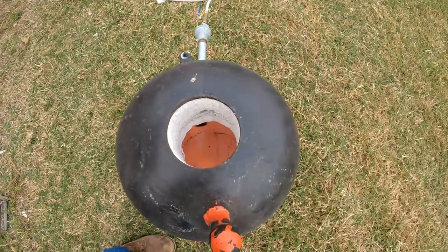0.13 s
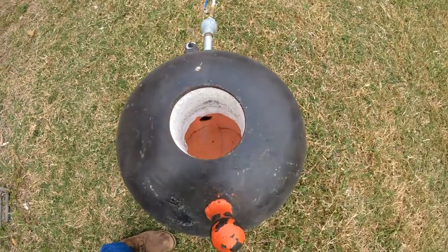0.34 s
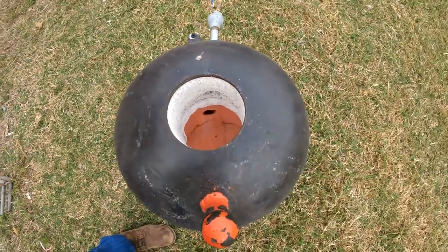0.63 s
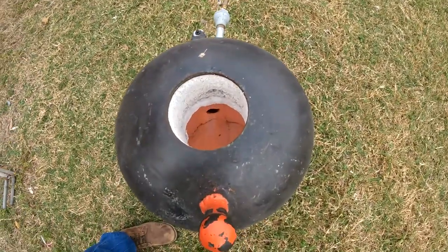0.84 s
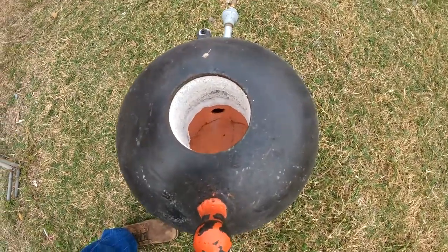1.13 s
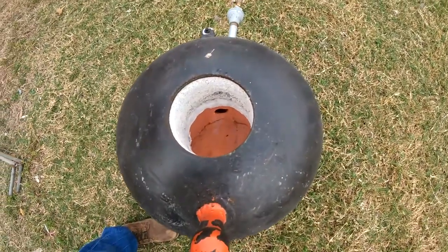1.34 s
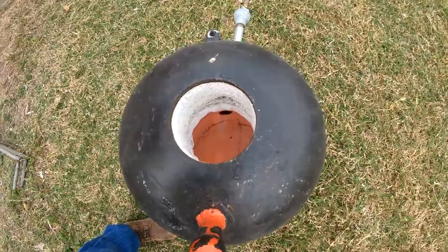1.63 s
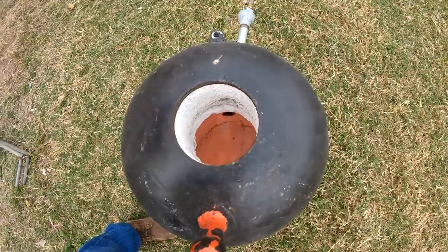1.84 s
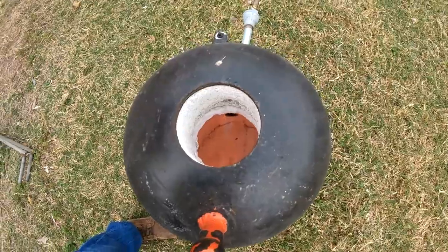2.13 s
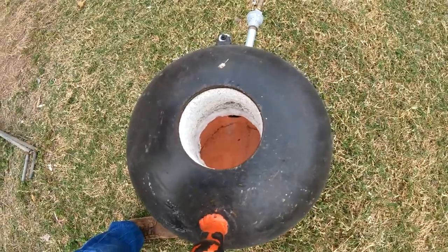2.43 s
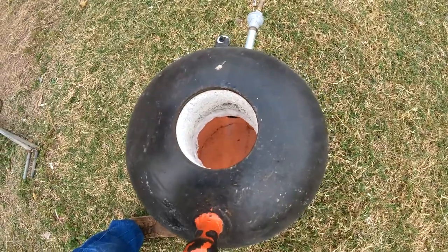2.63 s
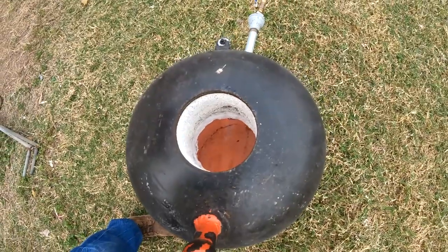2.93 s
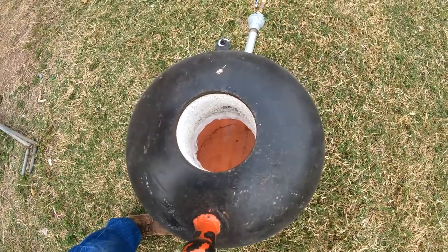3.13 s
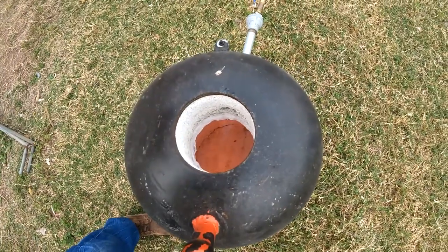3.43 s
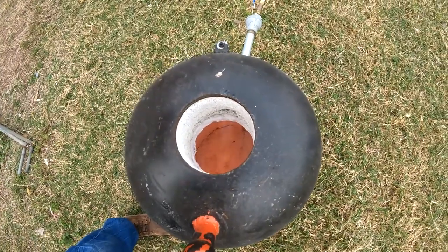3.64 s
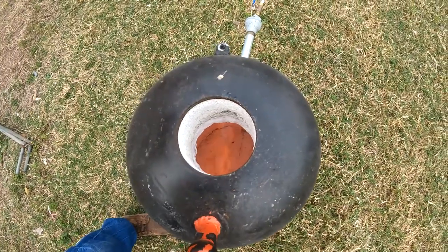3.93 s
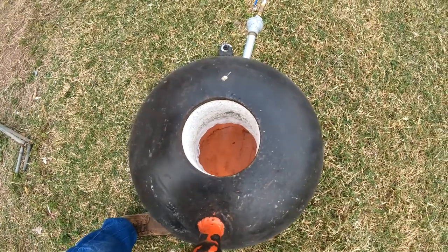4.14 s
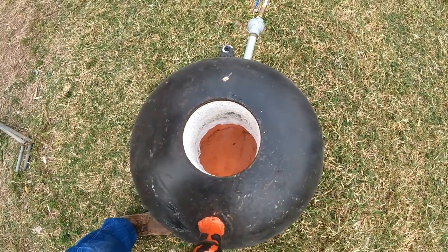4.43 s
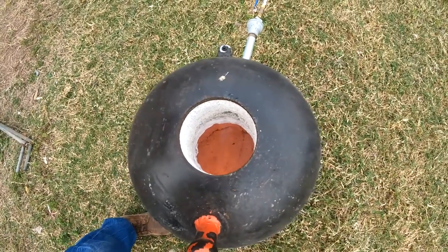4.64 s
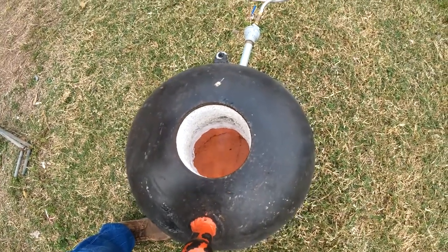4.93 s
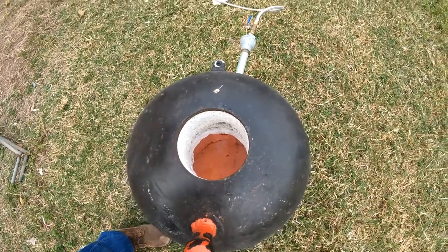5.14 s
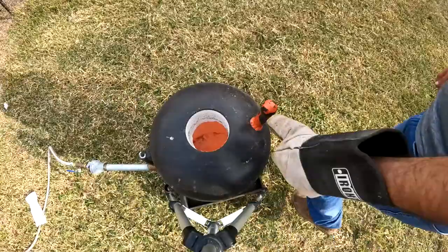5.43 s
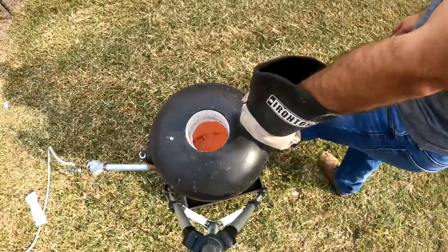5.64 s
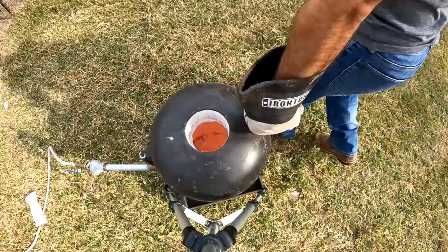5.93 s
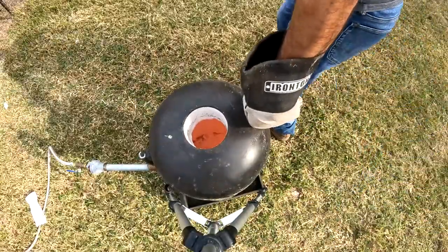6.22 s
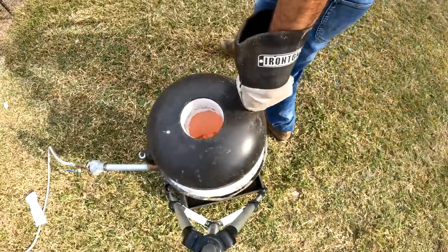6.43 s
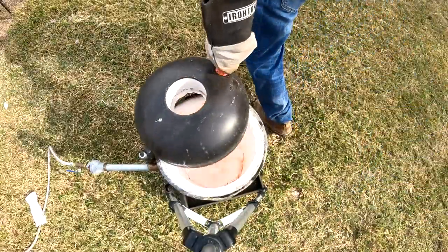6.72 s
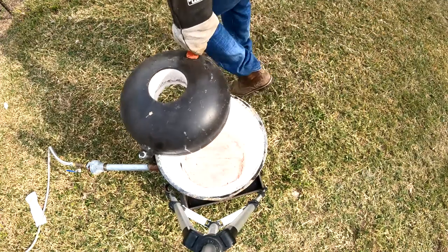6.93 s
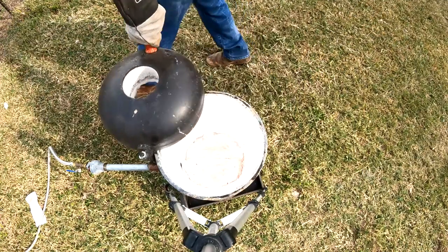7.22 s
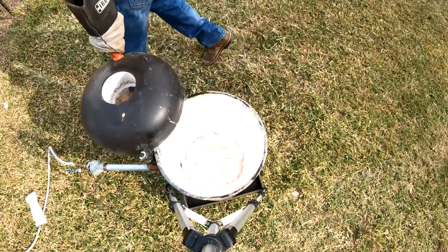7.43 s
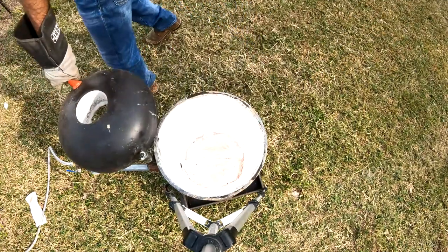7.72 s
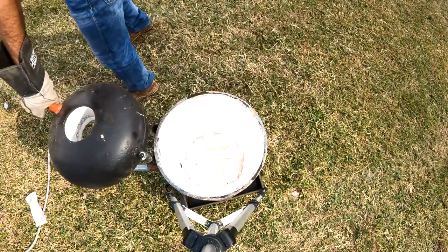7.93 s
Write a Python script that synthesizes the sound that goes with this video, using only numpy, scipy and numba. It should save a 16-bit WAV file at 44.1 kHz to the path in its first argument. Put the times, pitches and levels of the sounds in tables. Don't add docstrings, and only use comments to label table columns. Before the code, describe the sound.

From 0 to 5.2 seconds a gas burner roars inside a lidded furnace on a lawn, heard close from above with a handheld microphone. A deep, narrow boom around 155 to 165 Hz dominates, fluttering with quick gulps, over soft flame turbulence. Very quiet gas and grass hiss comes in small gusts, with faint insects trilling near 10 kHz and light low wind buffets. At about 5.26 seconds a tiny tick marks an abrupt move to a stand; the boom continues, narrower in stereo, and the flame briefly sinks around 5.5. From about 6.2 the lid swings off, and the hollow note jumps past 200 Hz, wavering upward to about 260 by the end. At 6.97 a dull lid-on-pivot knock leaves a thin steel ring. Until 8.1 the open roar is brighter, with an uneven narrow jet rush, clearer hiss and stronger wind buffets near the end.

```python
import sys
import numpy as np
from scipy import signal
from scipy.fft import rfft, irfft
from scipy.io import wavfile
from scipy.ndimage import uniform_filter1d
from numba import njit

SR = 44100
rng = np.random.default_rng(int(sys.argv[2]) if len(sys.argv) > 2 else 0)


def master_out(mix):
    frames = np.transpose(np.atleast_2d(mix))
    ceiling = np.clip(frames, -1, 1)
    pcm = np.round(ceiling * 32767).astype(np.int16)
    wavfile.write(sys.argv[1], SR, pcm)


def gain_from_decibels(decibels):
    exponent = np.asarray(decibels, float) / 20
    return 10 ** exponent


N = 356548
T = np.arange(N) / SR

CHANGE_S = 5.2605
AT_HAND = T < CHANGE_S
# time in seconds, share open 0-1
LID_OPEN = [
    (0, 0.05),
    (6.3, 0.02),
    (6.6, 0.8),
    (6.9, 0.92),
    (7.3, 0.83),
    (8.08, 1),
]
# time in seconds, share 0-1
MOUTH_BARED = [(0, 0.24), (6.5, 0), (6.7, 0.45), (6.85, .6), (7.0, 0.71), (7.5, 1), (8.08, 0.94)]

# time in seconds, pitch in Hz
HOLLOW_NOTE = [(0, 155), (1.3, 164.7), (3, 155), (5.2, 160.6), (5.8, 161.5), (6.15, 165.3), (6.27, 208.4),
               (6.39, 230.7), (6.5, 210.5), (6.68, 224), (6.8, 241.8), (7.1, 238.7), (8.08, 262.7)]
BOOM_DB, RUMBLE_DB, FLAME_DB = (-16.5, -17, -15), (-28.5, -33, -30), (-40, -40, -30.5)
# centre in seconds, half length in seconds, change in dB
FALTERS = [
    (.1, 0.22, 1),
    (1.25, .15, 0.5),
    (2.05, 0.11, 0.5),
    (4.2, 0.34, 0.5),
    (5.17, 0.075, 1.5),
    (5.5, 0.18, -4),
    (6.66, 0.072, 1),
    (6.87, 0.04, -4),
    (7.17, 0.11, 1),
    (7.45, 0.13, -1.5),
]
# centre in seconds, half length in seconds, change in dB
THROBS = [(.4, 0.018, -6), (1.32, 0.017, 2.5), (1.39, 0.014, -5), (1.75, 0.014, -5), (2.54, .015, -1),
          (3.18, .02, -4), (3.74, 0.01, -8), (4.29, 0.017, 3), (4.32, .02, -4), (4.645, 0.015, -9.5),
          (4.79, .012, -4.5), (5.13, 0.027, 2.5), (5.7, 0.014, -6), (6.12, 0.025, -4), (6.65, .015, 3.5),
          (6.78, 0.012, 7), (6.99, 0.015, -3), (7.05, 0.022, 0.5), (7.13, 0.011, 4.5), (7.155, .01, -9),
          (7.22, 0.036, 2), (7.29, 0.019, -6.5)]
# pitch in Hz, density in dB per Hz
RUMBLE_SHUT = [(8, -43), (18, -24.5), (30, -17), (60, 8), (100, 12.5), (140, 9.5), (200, -18.5),
               (300, -58.5), (600, -140)]
# pitch in Hz, density in dB per Hz
RUMBLE_OPEN = [(8, -46), (18, -12.5), (30, -6), (60, 2), (100, 1.5), (150, 7), (170, 5), (200, -3),
               (300, -53.5), (600, -140)]
# centre in seconds, half length in seconds, change in dB
RUMBLE_LULLS = [
    (2.45, 0.091, 5.5),
    (3.7, 0.18, 0),
    (6.1, 0.13, -13.5),
    (6.8, .2, -1.5),
    (7.9, 0.37, 2.5),
]
# pitch in Hz, density in dB per Hz
FLAME_SHUT = [
    [(200, -31), (340, -5), (354, -3), (426, 1.5), (698, -6.5), (848, -6.5), (939, -5), (1160, -7),
     (1430, -18.5), (1710, -21), (1870, -28.5), (2200, -33.5), (2860, -59), (4840, -120)],
    [(200, -33), (340, -3), (491, -4), (583, -10.5), (611, -14), (661, -13), (778, -14), (1130, -10.5),
     (1390, -26), (1880, -27.5), (2200, -36), (2860, -54.5), (4840, -120)],
]
# pitch in Hz, density in dB per Hz
FLAME_OPEN = [(200, -25), (340, -3), (377, -11), (424, -2), (520, -2.5), (644, -7), (750, -9), (803, -12),
              (1250, -15), (1800, -30.5), (2600, -35.5), (3380, -65.5), (5720, -120)]
# centre in seconds, half length in seconds, change in dB
LICKS = [
    (.52, .06, 4),
    (1.2, 0.11, 0.5),
    (3.4, 0.14, 0),
    (4.5, .1, -6.5),
    (4.73, 0.046, 0.5),
    (5.45, .1, 0),
    (6.3, 0.14, -3.5),
    (6.7, 0.049, 0),
    (7.5, 0.11, 1.5),
    (7.83, 0.09, 5),
]
# centre in seconds, half length in seconds, change in dB
FLARES = [(.5, .1, -0.5), (2, 0.096, -0.5), (3.4, .15, 1), (4.3, .1, 0.5), (4.9, 0.11, 1.5), (5.45, .1, -2),
          (6, .08, -2.5), (6.3, 0.11, -1), (6.72, .08, 1.5), (7.1, .1, 0.5), (7.3, 0.075, 1), (7.6, .1, 1)]
# pitch in Hz, width in Hz, level in dB
SHELL_HUMS = [(1975, 90, -73.5), (2406, 70, -76.5)]

HISS_DB, HISS_TOP_DB, AIR_DB = (-59.5, -60.5, -49.5), (-9, -6.5, -12), (-91, -88, -83)
# pitch in Hz, density in dB per Hz
HISS_SHUT = [
    [(1240, -29), (2100, -0.5), (3060, -3), (3270, -1.5), (4370, -1), (4940, -5), (5460, -5), (6200, -15),
     (8060, -39), (13600, -120)],
    [(1240, -31), (2100, -0.5), (2200, -7.5), (2380, 1.5), (2900, -4.5), (3410, -1), (3870, -4.5),
     (4540, -2), (6200, -15.5), (8060, -46.5), (13600, -120)],
]
# pitch in Hz, density in dB per Hz
HISS_OPEN = [(1240, -32), (2100, -8.5), (2440, -6), (2920, 1), (3390, 0), (5220, -7), (6200, -19.5),
             (8060, -46.5), (13600, -120)]
# pitch in Hz, density in dB per Hz
HISS_TOP = [(3500, -70.5), (4500, -25.5), (5500, -7), (6400, -8), (7400, -9.5), (8300, -12.5),
            (9300, -13.5), (10300, -13.5), (10700, -41.5), (11500, -95)]
# centre in seconds, half length in seconds, change in dB
BREEZE = [(.52, 0.033, 1.5), (1.3, 0.043, 1.5), (1.58, .03, 3), (1.8, .05, 1.5), (1.98, 0.038, -1),
          (2.32, 0.034, -1.5), (2.7, .05, 0), (2.84, 0.09, 3), (3.01, 0.02, 2), (3.17, 0.06, 3),
          (3.32, 0.032, 1.5), (3.44, 0.056, -3.5), (3.53, .05, -5.5), (3.632, 0.023, 3),
          (3.74, 0.052, -2.5), (3.92, 0.12, -3.5), (4.1, 0.049, 2.5), (4.27, .02, 1.5), (4.36, .04, 0),
          (4.5, 0.19, -7), (4.74, 0.05, 1.5), (4.86, .05, -2.5), (4.93, .03, -2.5), (5.02, 0.045, -6),
          (5.12, 0.03, 1), (5.2, 0.045, -4.5), (5.35, .12, -2), (5.6, .03, -2.5), (5.76, .04, 2.5),
          (6.08, 0.03, 0.5), (6.25, .1, 0), (6.68, 0.037, -1), (6.835, .012, 2), (6.87, .025, -0.5),
          (6.91, .015, -2.5), (6.95, 0.018, -3), (7.03, .03, 2.5), (7.14, 0.06, -2), (7.22, .025, 0.5),
          (7.28, 0.026, -2), (7.38, .05, 1.5), (7.51, 0.052, 1), (7.57, .02, -1.5), (7.63, .03, 1),
          (7.7, 0.04, -2), (7.81, .05, 4), (7.92, .04, 1.5)]
# pitch in Hz, gain in dB
GROUND_NOTCH = [(2700, -0.5), (2860, 1.5), (2990, -7.5), (3120, -0.5)]
# lower edge in Hz, upper edge in Hz, level in dB, share of patchiness
AIR_BANDS = [(10600, 11200, -9, 1), (11200, 11700, -6, 1), (11700, 12200, -4, .8), (12200, 12700, -4, .8),
             (12700, 13100, -6, 1), (13100, 13500, -7, 1), (13500, 13950, -6, .25), (13950, 14250, -10, .6),
             (14250, 14800, -18, 1.3)]

TRILL_RATE_HZ = [61.6, 63.4]
# centre in seconds, half length in seconds, change in dB
TRILL_BREAKS = [(.1, .12, 1), (.55, .15, -3), (1.2, .15, 3.5), (1.45, .05, -5), (1.99, .03, -10),
                (2.11, .03, 1), (2.69, .03, -13), (3.0, .04, -8), (4.2, 0.024, -8), (4.4, .06, 4),
                (4.54, 0.085, -8), (4.65, .03, -4), (4.78, .03, -7), (6.72, .1, -2), (7.5, 0.3, -7),
                (8.06, .15, 3)]
# band edges in Hz, levels before and after it presses in dB, time it presses in seconds
HIGH_SINGER = [(13550, 13900), (-103, -95), 1.8]
FAR_STOPS_S = 6.55

CALM_DB = -55
# centre in seconds, half length in seconds, dB over the calm
BUFFETS = [(.2, 0.076, 1), (.62, .15, 11), (1.0, .08, 5.5), (1.3, .13, 13), (1.55, .1, 7.5),
           (1.85, 0.073, 13), (2.1, 0.17, 12), (2.35, 0.19, 10.5), (3.38, 0.12, 12.5), (3.93, .08, 10),
           (4.47, 0.069, 17), (4.68, 0.04, 9.5), (6.32, .1, 27.5), (6.97, .08, 8.5), (7.25, .2, 7),
           (7.8, 0.14, 18.5), (8.05, .12, 23)]

# centre in seconds, half length in seconds, change in dB
JET_SURGES = [(5.7, 0.079, 5), (6.1, 0.093, 1), (6.6, .05, -9), (6.69, .05, 5), (6.87, 0.045, 8),
              (6.9, .015, 3), (6.94, .025, -5), (7.01, .02, 4), (7.05, 0.059, 1), (7.13, 0.03, 3),
              (7.23, .04, 4), (7.4, .05, 1.5), (7.51, 0.033, 2.5), (7.7, .04, -8), (7.84, 0.063, 4.5),
              (8.0, .06, 3.5)]
# time in seconds, level in dB
KNOCKS = [
    (6.9657, -16.5),
]
# pitch in Hz, level in dB, 60 dB decay in seconds
LID_MODES = [(680, -2, .025), (820, 0, .035), (1450, -3, .022), (1800, -10, .012), (2043, -20.5, .34),
             (2071, -25, .2), (2018, -31, .15), (2600, -25, .008), (2934, -32, .3)]

# time in seconds, dB over the usual width
WIDTH = [(0, -12), (1.2, -2), (3, 0.5), (5.25, 1.5), (5.27, -24.5), (6.9, -23), (7.1, -17), (7.6, -9.5),
         (8.08, -3.5)]
# pitch in Hz, side minus mid in dB
PORTS_HAND = [(50, -50), (110, -42), (165, -34), (220, -38.5), (290, -45.5), (400, -24), (600, -19.5),
              (800, -29.5), (900, -20.5), (1250, -17), (2300, -9.5), (7500, -8.5), (10000, -12),
              (12500, -1)]
# pitch in Hz, side minus mid in dB
PORTS_STAND = [(30, -60), (110, -32), (180, -30.5), (260, -33), (340, -46), (600, -44.5), (900, -26.5),
               (1250, -17), (2300, -9), (4500, -8.5), (8000, -1), (10000, -11.5), (12500, -13)]
# pitch in Hz, share in dB
LEAN_RIGHT = [(30, -57.5), (100, -52.5), (500, -38), (1000, -27), (1600, -50), (2400, -61)]
# pitch in Hz, share in dB
LEAN_LEFT = [(1600, -58.5), (4000, -27), (7500, -22), (9200, -28.5), (12000, -61.5)]
# start in seconds, end in seconds
ALIKE_BASS = [(0, .31), (.35, .47), (.77, .82), (1.08, 1.12), (1.2, 1.23), (5.27, 7.04), (7.44, 7.5),
              (7.53, 7.58)]


def read(table):
    s, *columns = np.transpose(table)
    return [np.interp(T, s, c) for c in columns]


def bumps(rows):
    return sum(db * np.exp(-((T - s) / half) ** 2) for s, half, db in rows)


def walk(rate):
    hold = int(SR / rate)
    levels = np.repeat(rng.standard_normal(N // hold + 1), hold)
    return 1.5 * uniform_filter1d(uniform_filter1d(levels, hold), hold)[:N]


def colour(x, points):
    hz, db = np.transpose(points)
    f = np.maximum(np.arange(N // 2 + 1) * SR / N, 1)
    return irfft(rfft(x) * gain_from_decibels(np.interp(np.log(f), np.log(hz), db)), N)


def above(x, hz, foot):
    return colour(x, [(foot * hz, -30), (hz, -3), (1.2 * hz, 0)])


def unit(x):
    return x / np.sqrt(np.mean(x ** 2))


def noise(points):
    return unit(colour(rng.standard_normal(N), points))


def band(lo, hi):
    return noise([(.98 * lo, -60), (lo, 0), (hi, 0), (1.02 * hi, -60)])


@njit
def svf(x, hz, width):
    y, b, l = np.empty(len(x)), 0., 0.
    for i in range(-4096, len(x)):
        f = hz[max(i, 0)]
        g = np.tan(np.pi * f / SR)
        k = width / f
        v = (b + g * (x[i] - l)) / (1 + g * (g + k))
        b = 2 * v - b
        l = l + 2 * g * v
        y[i] = k * v
    return y


def resonance(hz, width_hz, skirt_hz):
    centre = hz + np.zeros(N)
    ringing = svf(rng.standard_normal(N), centre, float(width_hz))
    return unit(svf(ringing, centre, float(skirt_hz)))


def state(levels_db, share):
    hand = levels_db[0] + .5 * np.minimum(T - 3, 0)
    stand = levels_db[1] + (levels_db[2] - levels_db[1]) * np.clip(share, 0, 1)
    return np.where(AT_HAND, hand, stand)


def through_lid(shut, opened):
    lid = np.clip(read(LID_OPEN)[0], 0, 1)
    closed = np.where(AT_HAND, noise(shut[0]), noise(shut[1]))
    return np.sqrt(1 - lid) * closed + np.sqrt(lid) * noise(opened)


def opening_swing():
    return -gain_from_decibels(-15.5) * np.cos(2 * np.pi * 150 * T) * np.exp(-T / .004)


def boom():
    ringing = resonance(read(HOLLOW_NOTE)[0], 61, 151)
    ringing = unit(colour(ringing, [(20, 12.5), (265, 1.0), (320, -5), (360, -11.5), (400, -24.5),
                                    (600, -38.0), (1200, -120)]))
    swing = uniform_filter1d(np.abs(signal.hilbert(ringing)), size=300)
    ringing = unit(ringing / (swing + .3) ** .14)
    db = state(BOOM_DB, read(MOUTH_BARED)[0]) + bumps(FALTERS)
    return gain_from_decibels(db + bumps(THROBS) + 0.19) * ringing


def rumble():
    db = state(RUMBLE_DB, read(LID_OPEN)[0]) + bumps(RUMBLE_LULLS)
    return gain_from_decibels(db + 1.5) * through_lid([RUMBLE_SHUT, RUMBLE_SHUT], RUMBLE_OPEN)


def flame():
    body = through_lid(FLAME_SHUT, FLAME_OPEN) * gain_from_decibels(.6 * walk(12))
    body = body + (gain_from_decibels(bumps(LICKS)) - 1) * above(body, 1400, .8)
    db = state(FLAME_DB, read(MOUTH_BARED)[0]) + 0.24 * bumps(FALTERS)
    db = db + bumps(FLARES) + 0.12 * bumps(BREEZE)
    return gain_from_decibels(db + 1.25) * body


def shell():
    return sum(gain_from_decibels(db + 1.6 * walk(5)) * resonance(hz, width, 2 * width) for hz, width, db in SHELL_HUMS)


def furnace():
    return boom() + rumble() + shell() + flame()


def hiss_db():
    step = np.clip((T - 6.83) / 0.031 + .5, 0, 1)
    early = 0.23
    bared = early * read(MOUTH_BARED)[0] + (1 - early) * step
    breeze = bumps(BREEZE)
    top_hand = HISS_TOP_DB[0] + .3 * breeze
    top_stand = state(HISS_TOP_DB, bared) - .5 * bared * breeze
    return state(HISS_DB, bared) + breeze, np.where(AT_HAND, top_hand, top_stand)


def hiss():
    db, top_db = hiss_db()
    puff = 0.3 * walk(18)
    low = through_lid(HISS_SHUT, HISS_OPEN) * gain_from_decibels(puff + .45 * walk(35))
    low = np.where((T > 2.6) & AT_HAND, colour(low, GROUND_NOTCH), low)
    low = low + (gain_from_decibels(0.43 * bumps(BREEZE)) - 1) * above(low, 4200, 0.7)
    top = noise(HISS_TOP) * gain_from_decibels(top_db + 1.2 * puff + 0.54 * walk(39) - 2.1)
    top = np.where(T < FAR_STOPS_S, top, colour(top, [(9800, -1), (10100, -13.5)]))
    return gain_from_decibels(db) * (low + top) + air(.6 * (np.minimum(db, -58) + top_db + 69))


def air(gust_db):
    patchy = np.where(AT_HAND, 1, .25)
    out = 0
    for lo, hi, db, share in AIR_BANDS:
        swell = patchy * share * (1.3 * gust_db - 2.5 + 4 * walk(22))
        swell = np.where(swell < -2, 5 * swell + 8, swell)
        out = out + gain_from_decibels(db + swell) * band(lo, hi)
    return gain_from_decibels(state(AIR_DB, read(MOUTH_BARED)[0] ** 4)) * out


def trill(hz, rate_hz, depth, sweep_hz):
    phase = np.cumsum(rate_hz * (1 + .004 * walk(3)) / SR) % 1
    stroke = depth + np.exp(-((phase - .5) / 0.3) ** 2) * gain_from_decibels(1.5 * walk(44))
    note = hz + sweep_hz * (phase - .5) + 60 * walk(300)
    rasp = resonance(note - 180, 400, 550)
    chirp = (np.sin(2 * np.pi * np.cumsum(note) / SR) + .55 * rasp) * stroke
    return unit(colour(chirp, [(8000, -40), (9000, 0), (10600, 0), (11000, -40)]))


def insects():
    cold = np.exp(-(T / 1.6) ** 2 / 2)
    hz = np.where(AT_HAND, 10130, 9620) - 450 * cold
    db = np.where(AT_HAND, -71.5, -76.5) - 9.5 * cold + bumps(TRILL_BREAKS) + 1.5 * walk(9)
    near_rate = np.where(AT_HAND, *TRILL_RATE_HZ)
    near = trill(hz + np.where(AT_HAND, 120, 0), near_rate, .12, np.where(AT_HAND, 600, 350))
    near = gain_from_decibels(np.maximum(db, -82) + 1) * near
    far = trill(np.where(AT_HAND, hz + 250, 10400), TRILL_RATE_HZ[0], .2, 700)
    far = gain_from_decibels(np.where(AT_HAND, -85, -80)) * (T < FAR_STOPS_S) * far
    (lo, hi), (soft_db, loud_db), presses_s = HIGH_SINGER
    high_db = np.where(T < presses_s, soft_db, loud_db) + 2 * walk(12)
    high = AT_HAND * gain_from_decibels(high_db) * band(lo, hi)
    return near + far + high


def wind():
    pressure = noise([(8, -29.5), (18, 16.5), (28, 17.5), (45, -1.0), (90, -12.5), (200, -44.5), (500, -120)])
    return pressure * gain_from_decibels(1.2 * walk(3.1))


def jet():
    centre_hz = 3340 * (1 + .02 * walk(6.5))
    rush = resonance(centre_hz, 650, 1.7 * 650)
    rush = unit(colour(rush, [(2500, -13.5), (2800, -0.5), (3800, 0.5), (4100, -9.5)]))
    shut_db, open_db = -67.5, -53.5
    db = shut_db + (open_db - shut_db) * np.clip(read(MOUTH_BARED)[0], 0, 1) + bumps(JET_SURGES)
    return ~AT_HAND * gain_from_decibels(db) * rush


def change_tick():
    out = np.zeros(N)
    out[int(CHANGE_S * SR)] = gain_from_decibels(-37.5)
    return out


def lid_knock():
    out, t = np.zeros(N), np.arange(SR // 2) / SR
    contact = 1 - np.exp(-(t / .0005) ** 2)
    ring = 0
    for hz, db, t60 in LID_MODES:
        mode = np.cos(2 * np.pi * hz * (t - .0008))
        mode = mode * np.exp(-np.log(1000) * t / t60)
        if t60 > .1:
            mode = mode * (1 - np.exp(-t / .008))
        ring = ring + gain_from_decibels(db) * mode
    for s, db in KNOCKS:
        out[int(s * SR):][:len(t)] -= gain_from_decibels(db - 2) * ring * contact
    return out


def lasting_sources():
    return furnace() + hiss() + insects() + jet()


def wind_difference(gust):
    unlike_db = np.select([AT_HAND, T < 7.03], [-22, -69.5], -14.5)
    db = unlike_db - 9.5 + .7 * bumps(BUFFETS)
    return gain_from_decibels(db) * gust * colour(wind(), [(20, -5.5), (45, 14), (80, 22.5), (200, 7.0)])


def scene():
    gust = gain_from_decibels(CALM_DB + bumps(BUFFETS))
    mid = lasting_sources() + opening_swing() + change_tick() + lid_knock() + gust * wind()
    late = signal.hilbert(mid).imag
    apart = 0.95 * late + .55 * lasting_sources()
    by_place = np.where(AT_HAND, colour(apart, PORTS_HAND), colour(apart, PORTS_STAND))
    side = gain_from_decibels(read(WIDTH)[0]) * by_place + wind_difference(gust)
    side = side + AT_HAND * (colour(mid, LEAN_LEFT) - colour(mid, LEAN_RIGHT))
    side = side + ~AT_HAND * gain_from_decibels(-4) * air(np.zeros(N))
    spells = 1. * sum((T >= start) & (T < end) for start, end in ALIKE_BASS)
    alike = uniform_filter1d(spells, size=300)
    side = side - alike * colour(side, [(330, 0), (1.15 * 330, -60)])
    return np.array([mid + side, mid - side])


def band_limit(x):
    return signal.sosfilt(signal.butter(12, 14830, fs=SR, output="sos"), x)


def record(dry):
    limit = .4
    swing = uniform_filter1d(np.abs(signal.hilbert(dry.mean(axis=0))), size=400)
    gain = uniform_filter1d(np.minimum(1, limit / (swing + 1e-9)) ** .6, size=400)
    return band_limit(dry * gain)


dry = scene()
out = record(dry)
master_out(out)
```